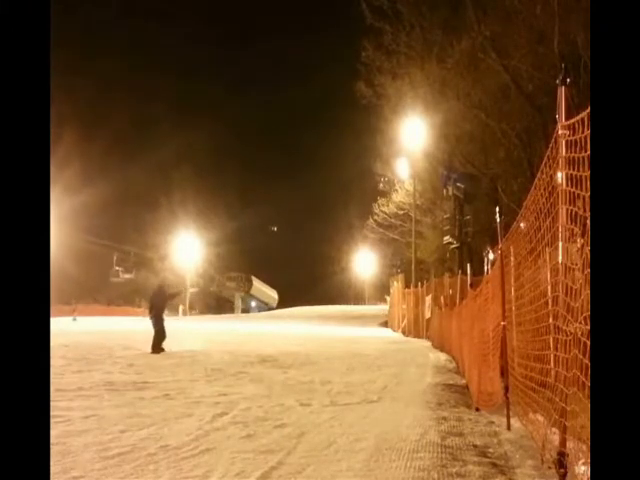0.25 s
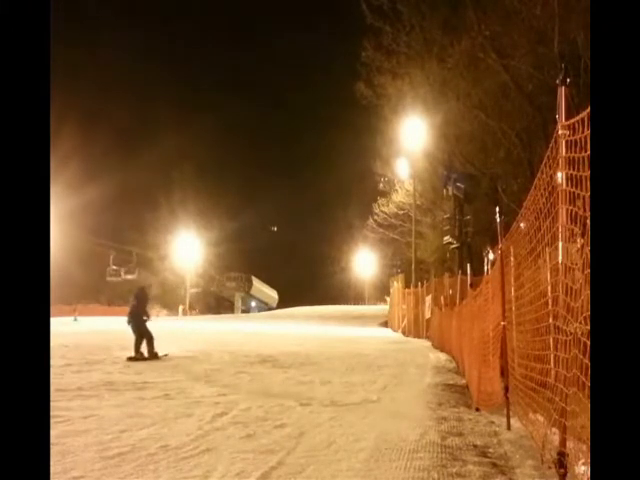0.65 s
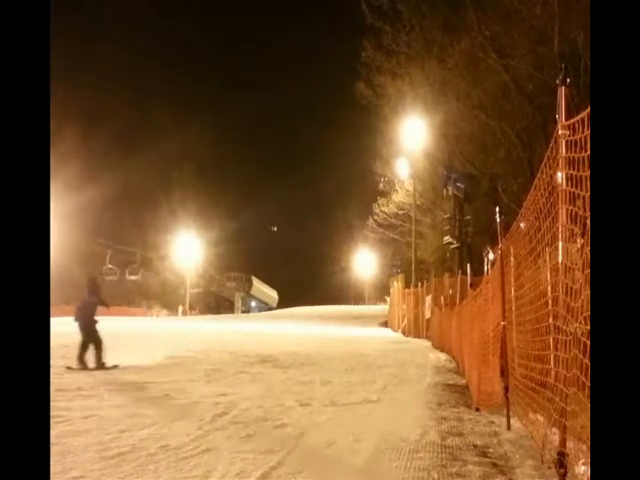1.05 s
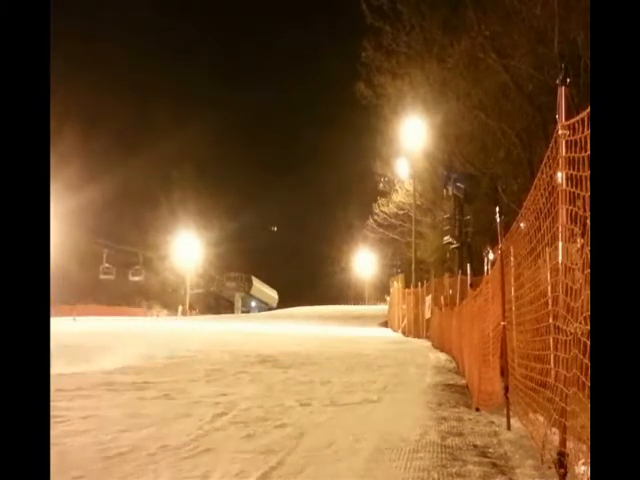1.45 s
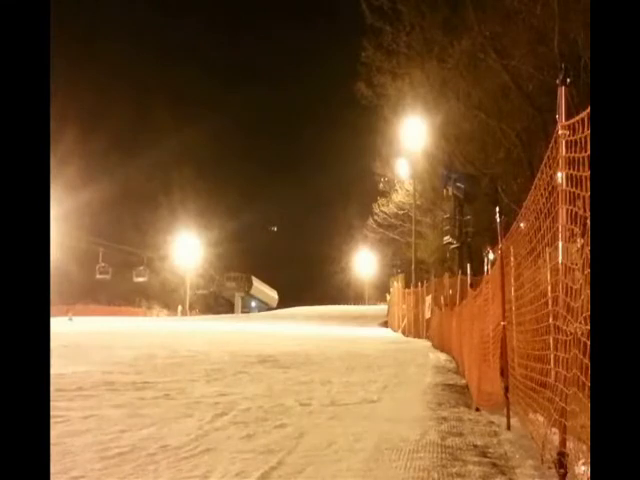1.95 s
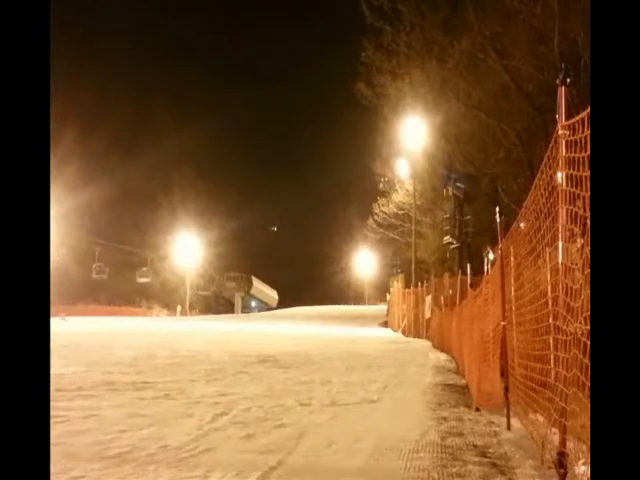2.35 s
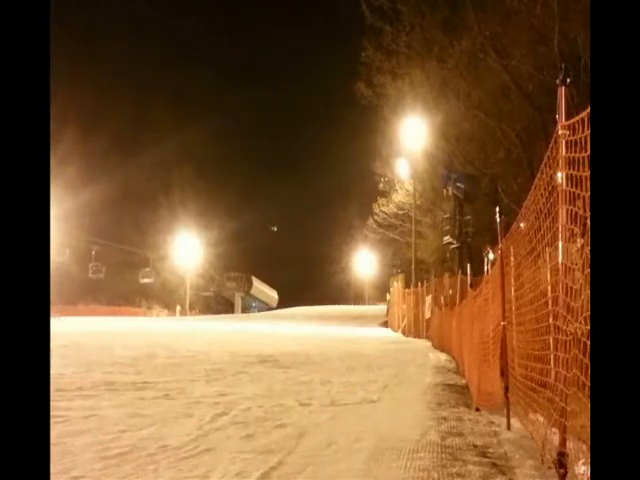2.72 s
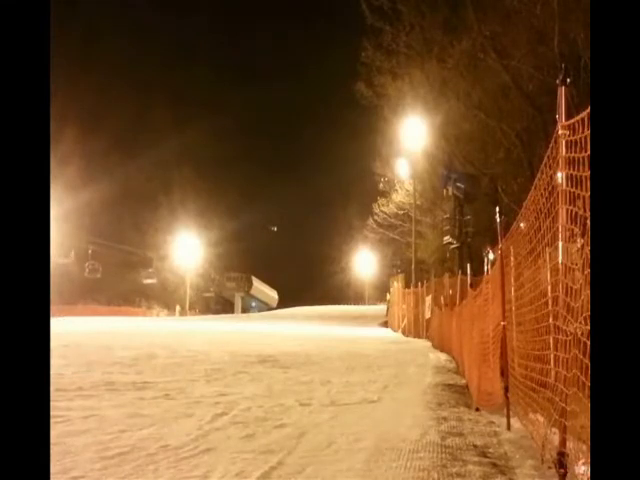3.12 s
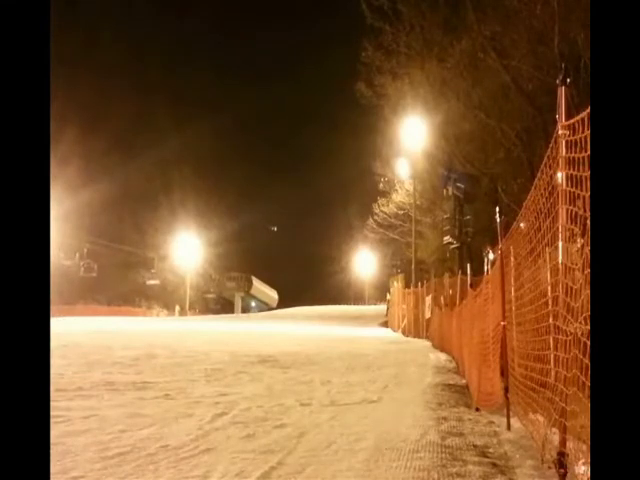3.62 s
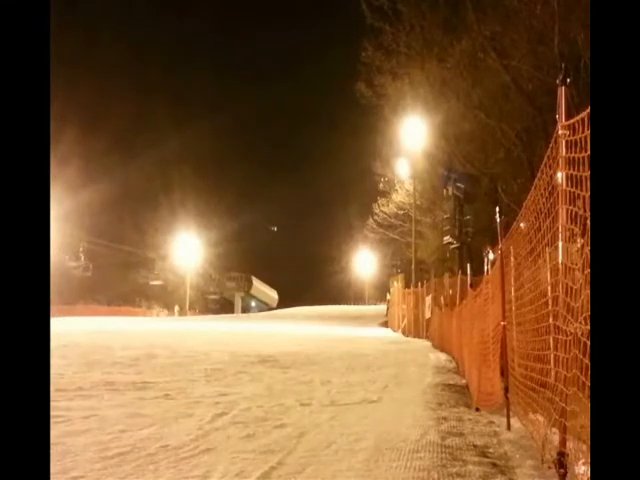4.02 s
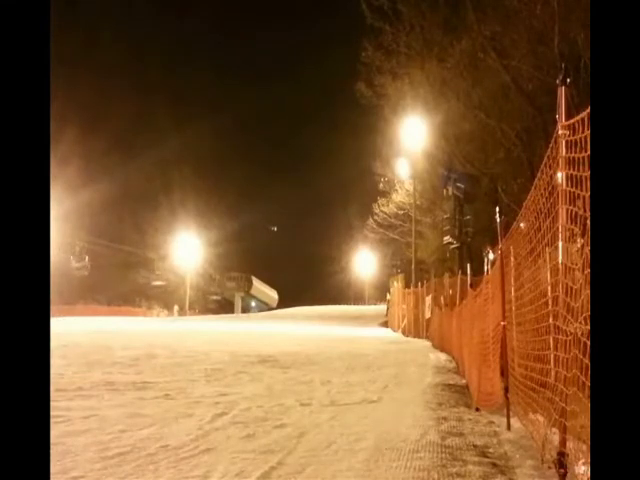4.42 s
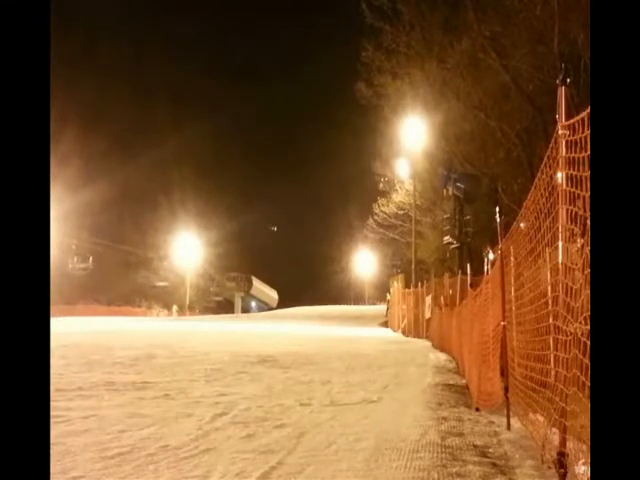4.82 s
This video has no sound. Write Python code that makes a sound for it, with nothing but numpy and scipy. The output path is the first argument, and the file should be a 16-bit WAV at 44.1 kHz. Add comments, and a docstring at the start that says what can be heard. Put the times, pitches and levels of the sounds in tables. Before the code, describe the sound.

On an open night slope, a quiet low lift hum and far hiss come first. A snowboard edge quickly rises into gritty scraping, with rumble, icy crunch and spray swelling around two to three seconds, then continuing in harsh, uneven scrapes. Small ice cracks and dull thumps punctuate it. A handheld stereo microphone hears the rider swing from ahead to the left.

```python
"""A groomed night slope: a snowboard carves past a phone, swinging from ahead to its left side.
Snapping crystals ring resonances as the board's rumble, the edge's scrape and crunch, and the spray;
noise bursts make cracks of ice and thumps over ridges. Resonant noise and wavering tones make a lift
drive's hum, under a faint tone that rises and shaped noise as far hiss.
Two microphone ports, each with its own treble resonance, hear the rider with a growing lag."""
import sys
import numpy as np
from scipy import signal
from scipy.fft import rfft, irfft
from scipy.io import wavfile
from scipy.ndimage import uniform_filter1d, map_coordinates

SR = 44100
rng = np.random.default_rng(int(sys.argv[2]) if len(sys.argv) > 2 else 0)


def convert_level_to_amplitude(level_db):
    """Map a level in decibels to its linear amplitude factor."""
    exponent = np.asarray(level_db, float) / 20
    return 10 ** exponent


def dump(signal):
    """Clip the signal to [-1, 1] and save it as 16-bit WAV at the path in sys.argv[1]."""
    limited = np.clip(np.atleast_2d(signal).T, -1, 1)
    pcm = np.round(limited * 32767).astype(np.int16)
    wavfile.write(sys.argv[1], SR, pcm)


N = 223496

# the left port's lead over the right, which each layer scales by its own factor
LEAD_AHEAD_MS, LEAD_ABEAM_MS = 0.055, 0.488


def unit(x):
    """Scale to rms 1."""
    return x / np.sqrt(np.mean(x ** 2))


def curves(table):
    """Columns of a table as per-sample lines; the first column is time in seconds."""
    s, *columns = np.transpose(table)
    return [np.interp(np.arange(N) / SR, s, column) for column in columns]


def ring(x, hz, width):
    """Resonance, gain 1 at the centre; width in Hz."""
    return signal.lfilter(*signal.iirpeak(hz, hz / width, fs=SR), x)


def walk(rate):
    """Random levels held 1 / rate seconds and slewed twice; spread 1."""
    hold = int(SR / rate)
    steps = np.repeat(rng.standard_normal(N // hold + 1), hold)
    smooth = uniform_filter1d(uniform_filter1d(steps, hold), hold)
    return unit(smooth[:N])


def ports(pair):
    """Each microphone port rings at its own treble pitch."""
    # Resonance of the left, then the right port.
    # Each row: pitch in Hz, width in Hz, level of the added ring in dB.
    port_rings = [(5710, 3560, 2), (6750, 1840, 10.5)]
    return np.array([x + convert_level_to_amplitude(db) * ring(x, hz, width) for x, (hz, width, db) in zip(pair, port_rings)])


def breaks(rate, scatter_db):
    """Crystals snap at random moments, a few much harder than the rest."""
    snapping = rng.random(N) < rate / SR
    hardness = convert_level_to_amplitude(scatter_db * rng.exponential(size=N))
    push = rng.standard_normal(N)
    return unit(snapping * hardness * push)


def layer(modes, grain, tilt_db, fine_db, chatter_db, lead_ms):
    """Snaps ring a set of resonances; the right port hears them late, both hear scattered sound of their own."""
    rate, scatter_db, flicker_db, share, scattered_db, lead_factor = grain
    snaps = np.array([breaks(rate, scatter_db) for _ in range(3)])
    rung = 0
    for hz, width, db in modes:
        # the treble tilts about the second resonance; fine_db moves the treble above 9000 Hz
        mode_db = db + tilt_db * np.log2(hz / modes[1][0]) + (hz > 9000) * fine_db
        mode_db = mode_db + flicker_db * walk(25.02) + share * chatter_db
        rung = rung + convert_level_to_amplitude(mode_db) * ring(ring(snaps, hz, width), hz, 0.92 * width)
    direct, left, right = rung
    heard_at = np.arange(N) - lead_factor * lead_ms * SR / 1000
    late = map_coordinates(direct, [heard_at], order=3, mode="nearest")
    # more scattered sound while the rider is far ahead and the lead still short: 23.5 dB per ms
    scattered = convert_level_to_amplitude(scattered_db + 23.5 * (LEAD_ABEAM_MS - lead_ms))
    pair = np.array([direct, late]) + scattered * np.array([left, right])
    return unit(ports(pair / np.hypot(1, scattered)))


def carving(lead_ms):
    """Rumble, scrape, crunch and spray follow the turn and share the chatter of the edge over the groomed ribs."""
    # The ride through the turn, before each layer weighs it. Each row: time in seconds, pressure on the
    # edge in dB, bite in dB (cutting rather than skidding), flex of the board in dB.
    turn_moves = [(0.0, -49.5, 19.5, 17), (0.14, -30.5, 3.5, 7), (0.38, -34.5, 4.5, 9),
                  (0.55, -24.5, -1, 4), (0.66, -21.5, 1, 4), (0.73, -18, 4.5, 5.5), (0.83, -19, -0.5, 3),
                  (0.92, -14, -5.5, 3.5), (0.99, -14, -3.5, 1.5), (1.07, -18.5, -1.5, 3),
                  (1.24, -21, 1.5, 1.5), (1.31, -20, 3, -4), (1.36, -19.5, -6.5, -6), (1.4, -21, -9, -1),
                  (1.45, -17, -2.5, -6), (1.64, -25, -1.5, 4), (1.86, -18.5, 4, 6), (1.95, -16.5, 3, 5),
                  (2.03, -12.5, -0.5, 1), (2.12, -12, -2, 0), (2.2, -13.5, -3, 0), (2.33, -13.5, -4, 0.5),
                  (2.46, -14, -0.5, 0.5), (2.49, -13, 0.5, 4.5), (2.6, -14, 4.5, 0.5), (2.7, -15.5, 6, 3.5),
                  (2.77, -17, -1.5, 0.5), (2.83, -13, -6, -4), (2.92, -15.5, -0.5, -1), (3.0, -20, 1, 0),
                  (3.1, -16, 6, -1), (3.19, -15, 4.5, -1.5), (3.3, -14.5, 5.5, -0.5), (3.4, -16.5, 8, 0.5),
                  (3.5, -19, 7.5, 3), (3.64, -17.5, 12, -2), (3.82, -14, 11.5, -2.5),
                  (3.9, -16.5, 10.5, -2), (4.04, -16.5, 14.5, 1.5), (4.1, -18.5, 15.5, 3),
                  (4.14, -20, 16, 1.5), (4.19, -22.5, 11, 1.5), (4.36, -20, 7.5, -1),
                  (4.48, -18.5, 10.5, 2.5), (4.58, -16.5, 9, -1), (4.68, -17, 11.5, 0),
                  (4.75, -19.5, 11, 1), (4.8, -20, 8, -8), (4.85, -21, 18, -1.5), (4.9, -15, 10.5, -2),
                  (5.01, -19, 13.5, 3.5), (5.07, -26.5, 21.5, 8)]
    # The edge skips off the snow. Each row: centre in seconds, length in seconds, level change in dB.
    edge_skips = [(3.046, .017, -9.5), (4.770, .026, -4.5), (4.97, .02, -4)]
    # The edge digs in abruptly. Each row: centre in seconds, length in seconds,
    # strength in dB before each layer weighs it.
    edge_digs = [(0.72, 0.05, 3), (0.92, 0.022, -0.5), (1.39, 0.057, 0), (2.48, 0.082, 2.5),
                 (2.536, 0.021, 1), (3.021, 0.017, 2.5), (3.046, 0.013, 7), (4.477, 0.014, 5.5),
                 (4.801, 0.039, 4), (4.84, 0.039, 5), (4.915, 0.03, 4.5), (5.03, 0.096, 1)]
    # Level of the treble above 9000 Hz. Each row: time in seconds, level change in dB.
    top_treble = [(0, -14), (.4, 17), (.65, 21.5), (.9, -3), (1.08, 18), (1.2, 19), (1.32, 23), (1.42, 28),
                  (1.55, 21), (1.8, 13), (2.1, 18), (2.35, 15), (2.6, -28), (2.75, 0), (2.85, 2),
                  (2.95, -11), (3.08, -23), (3.3, -6), (3.5, -11), (3.9, 13), (4.25, 15), (4.55, 9),
                  (4.8, -16), (5.07, -7)]
    # Resonances of board, edge, ice crystals and spray, struck in two passes.
    # Each row: pitch in Hz, width of the first pass in Hz, level against its neighbours in dB before tilt.
    rumble_modes, scrape_modes = [(171, 9.1, -23), (243, 186, 4), (339, 180, 1), (445, 342, -2),
                                  (664, 690, -14)], [(760, 2130, 7.6), (1273, 1700, 2.5), (1985, 2430, 8.2)]
    crunch_modes, spray_modes = [(3055, 830, 7.9), (3776, 1100, 3.7), (4555, 2850, 3)], [(6080, 2300, 15.5), (7414, 2270, 17.5), (8240, 2100, 10),
                                                 (9880, 610, 1.5), (12050, 1600, 5.5)]
    # Texture of rumble, scrape, crunch and spray. Each row: breaks per second, size scatter in dB,
    # own flicker in dB, share of the chatter, scattered sound abeam in dB, factor on the lead.
    textures = [(1800, .8, 1.2, 0.5, -12, 1.13), (5974, 1, 2.2, 0.2, -5, 1.07),
                (14960, 2.2, 0.95, 0.85, -7, .97), (25100, 1.6, 1.1, 0.97, -9, .95)]
    # How the same four layers follow the rider. Each row: offset in dB, then dB per dB of bite,
    # per dB of flex, per ms of lead, per dB of dig.
    layer_levels = [(-8.5, -0.19, 1.47, -0.1, -0.93), (-9, 0.7263, 0.46, -2.55, 0.17),
                    (-6, 0.1446, 0.21, 0, 1.5), (-0.76, -0.32, 0.27, -10.5, 0.35)]
    # Treble tilt of the same four layers. Each row: tilt in dB per octave, then its change per dB of bite,
    # per ms of lead, per dB of flex, per dB of dig.
    layer_tilts = [(-7, -0.0558, 41, 0.24, 1.3), (-1, 0.35, -4.5, 0.1, -1), (13.5, -2, 20, 0.5, -3),
                   (-6.5, 0.9, -28, 0.3, -1.5)]
    # The phone shades its far port, in the same four layers.
    # Each row: left minus right at no lead in dB, its growth in dB per ms of lead.
    phone_shade = [(3.5, -2), (0.7, 8), (0, 16), (2, 3)]

    t = np.arange(N) / SR
    chatter_db = 0.8 * walk(40) + 0.9 * walk(140)
    skip_db = sum(db * np.exp(-((t - s) * 2 / length) ** 6) for s, length, db in edge_skips)
    dig_db = sum(db * np.exp(-((t - s) * 2 / length) ** 4) for s, length, db in edge_digs)
    fine_db, = curves(top_treble)
    pressure_db, bite_db, flex_db = curves(turn_moves)
    all_modes = (rumble_modes, scrape_modes, crunch_modes, spray_modes)
    out = 0
    for modes, grain, mix, tilt, shade in zip(all_modes, textures, layer_levels, layer_tilts, phone_shade):
        db = pressure_db + mix[0] + mix[1] * bite_db + mix[2] * flex_db + mix[3] * lead_ms + mix[4] * dig_db
        tilt_db = tilt[0] + tilt[1] * bite_db + tilt[2] * lead_ms + tilt[3] * flex_db + tilt[4] * dig_db
        pan_db = shade[0] + shade[1] * lead_ms
        gain = convert_level_to_amplitude(db + skip_db + np.array([pan_db, -pan_db]) / 2)
        out = out + gain * layer(modes, grain, tilt_db, fine_db, chatter_db, lead_ms)
    return out


def whistle(pair):
    """A narrow ring of each port that grows as it faces the spray."""
    # A port whistles when the spray blows straight into it.
    # Each row: time in seconds, left ring in dB, right ring in dB.
    facing_spray = [(0, 7, -9), (.6, 0.5, -4), (.9, -5, -1.5), (1.33, -14, -4), (1.45, -25, -7),
                    (1.9, -7.5, -6), (2.15, 0.5, -3), (2.4, -4, -18), (2.7, -5.5, 2), (2.85, -7, 1),
                    (3.0, 2, 14), (3.15, -4, 11), (3.3, -2, 11), (3.42, 2.5, -10), (3.52, 5, 8),
                    (3.7, -7.5, 4.5), (4.0, -9.5, -2), (4.3, -9, -6), (4.65, -12, 4), (4.8, 7, 10),
                    (4.92, -0.5, 1), (5.07, 1, 0)]
    # Whistle of the left, then the right port. Each row: pitch in Hz, width in Hz.
    port_whistles = [(4850, 860), (6780, 680)]
    return np.array([x + convert_level_to_amplitude(db) * ring(x, hz, width)
                     for x, db, (hz, width) in zip(pair, curves(facing_spray), port_whistles)])


def lift_drive():
    """A wavering hum, nearly alike in both ports: resonant noise plus tones."""
    # Noise resonances, each rung twice. Each row: pitch in Hz, width of a pass in Hz, relative level in dB.
    hum_modes = [(33, 24, -21), (55, 16, -21), (92, 21, -2), (123, 70, 4), (158.6, 20, 1.5)]
    # Steady pitches; the lowest two beat against each other.
    # Each row: pitch in Hz, peak over the noise's rms in dB, wavering in dB, wavers per second.
    hum_tones = [(53.6, -6, 2, 3), (57.0, -7, 2, 3), (110, -4, 3.5, 7), (164, -9, 4, 8)]
    # Level of the hum, sinking as the ride goes on. Each row: time in seconds, level in dB.
    hum_level = [(0, -37), (.15, -34.5), (.4, -33.5), (.8, -35), (1.1, -36.5), (1.5, -37.5), (2, -39),
                 (3, -43), (4, -50.5), (4.5, -45.5), (5.07, -53)]
    mid, side = sum(convert_level_to_amplitude(db) * unit(ring(ring(rng.standard_normal((2, N)), hz, width), hz, width))
                    for hz, width, db in hum_modes)
    hum = unit(mid + 0.19 * np.array([side, -side]))
    t = np.arange(N) / SR - 0.11  # the tones line up at 0.11 s, a crest of the beat
    port_phase = np.array([[0.2], [-0.2]])  # radians
    for hz, db, waver_db, rate in hum_tones:
        hum = hum + convert_level_to_amplitude(db + waver_db * walk(rate)) * np.sin(2 * np.pi * hz * t + port_phase)
    return convert_level_to_amplitude(curves(hum_level)[0]) * hum


def whine():
    """A faint flickering sine glides up, then settles slightly lower."""
    # Each row: time in seconds, pitch in Hz, peak level in dB before the flicker.
    whine_glide = [(.1, 375, -53), (.2, 395, -43), (.4, 445, -46), (.55, 481, -42), (.65, 484, -43),
                   (.75, 470, -50)]
    hz, db = curves(whine_glide)
    return convert_level_to_amplitude(db + 6 * walk(24.1)) * np.sin(2 * np.pi * np.cumsum(hz) / SR)


def far_hiss():
    """Smooth noise shaped in frequency, wider in the treble than in the bass, fading slowly."""
    # Spectrum of the hiss. Each row: frequency in Hz, relative density in dB per Hz.
    hiss_shape = [(90, -17), (180, 1.5), (450, -9), (700, -11), (3300, -17), (6500, -12.5), (10000, -14.5),
                  (13000, -19.5), (15000, -14)]
    hz = np.fft.rfftfreq(N, 1 / SR) + 1  # + 1 keeps the logarithm finite
    at_hz, db = np.transpose(hiss_shape)
    mid, side = rfft(rng.standard_normal((2, N))) * convert_level_to_amplitude(np.interp(np.log(hz), np.log(at_hz), db))
    side = side * np.minimum(hz / 640.0, 0.7)
    hiss = irfft(np.array([mid + side, mid - side]), N)
    start_db, db_per_s = -26.5, -1.5
    return convert_level_to_amplitude(start_db + db_per_s * np.arange(N) / SR) * unit(ports(hiss))


def blows(table, fade_ms, width, db, lead_ms):
    """Each blow is a fading burst of noise around its pitch; the right port hears it late."""
    length = 2048  # samples
    out = np.zeros((2, N + 2 * length))
    fade = np.exp(-np.arange(length) / SR * 1000 / fade_ms)
    for (s, peak_db, hz), noise in zip(table, rng.standard_normal((len(table), length))):
        burst = ring(ring(noise * fade, hz, width * hz), hz, width * hz)
        burst = convert_level_to_amplitude(peak_db + db) * burst / np.abs(burst).max()
        at = int(s * SR)
        late = at + int(lead_ms[at] * SR / 1000)
        for port, start in zip(out, (at, late)):
            port[start:start + length] += burst
    return out[:, :N]


def cracks_and_thumps(lead_ms):
    """Lumps of ice crack under the edge; the board thumps over hard ridges."""
    # Single blows. Each row: start in seconds, peak in dB before the level of its kind, pitch in Hz.
    ice_cracks, ridge_thumps = [(0.906, -6, 5180), (1.129, -4, 7270), (1.409, -4, 6200), (1.458, -4, 5870),
                                (2.4615, -23, 7500), (3.01, -8.5, 6500), (3.0324, -8, 6700),
                                (3.054, -16, 6660), (3.1637, -26, 6770), (3.3997, -6, 4690),
                                (3.8057, -11, 2250), (3.9624, -3.5, 2030), (4.007, -9, 2190),
                                (4.1001, -5, 1930), (4.7005, -5, 5150), (4.794, -12, 4680),
                                (4.8124, -21, 5330), (4.8454, -20, 4940), (4.91, -5, 4770),
                                (4.9498, -9, 1780), (4.9974, -16, 1960)], [(0.898, -7.5, 266), (0.954, -9, 339), (0.996, -8, 197),
                                                (1.529, -14, 188), (1.839, -19, 355), (2.468, -10, 366),
                                                (2.485, -10, 207), (2.497, -12.5, 318), (2.528, -16, 210),
                                                (2.546, -6, 590), (2.596, -15, 450), (2.667, -23, 223),
                                                (2.694, -27, 320), (2.732, -12, 495)]
    # Cracks, then thumps. Each row: fade time constant in ms, width of each of two passes over pitch,
    # level in the ports in dB.
    blow_kinds = [(2.0, 1.0, -1), (6.0, 1.2, -4)]
    return sum(blows(table, *kind, lead_ms) for table, kind in zip((ice_cracks, ridge_thumps), blow_kinds))


def detour(right):
    """The right port also hears the rider a moment later round the phone's body.

    The shrinking second path sweeps a notch up the treble while the rider draws level."""
    centre_s, length_s, peak_share = 3.214, 0.17, 0.42
    t = np.arange(N) / SR - centre_s
    share = peak_share * np.exp(-(t / length_s) ** 4)
    notch_hz = 4900 * 2 ** (2.8 * np.clip(t, -1, 1))  # rises 2.8 octaves per second
    delay = SR / (2 * notch_hz)  # half a period of the notch
    late = map_coordinates(right, [np.arange(N) - delay], mode="nearest")
    return (right + share * late) / (1 + share)


def board():
    """The carving edge and its blows, as the ports hear them while the rider swings abeam."""
    t = np.arange(N) / SR
    swing_s, swing_length_s = 2.326, 1.34
    swing = (1 + np.tanh((t - swing_s) / swing_length_s)) / 2
    lead_ms = LEAD_AHEAD_MS + (LEAD_ABEAM_MS - LEAD_AHEAD_MS) * swing
    left, right = carving(lead_ms) + cracks_and_thumps(lead_ms)
    out = whistle([left, detour(right)])
    # a narrow board radiates no deep bass
    return signal.sosfilt(signal.butter(4, 115.0, "high", fs=SR, output="sos"), out)


def scene():
    """The rider over the lift drive, the faint tone and the far hiss."""
    return board() + whine() + lift_drive() + far_hiss()


def roll_off(x):
    """The treble ends steeply here."""
    return signal.sosfilt(signal.butter(12, 14520, fs=SR, output="sos"), x)


def record(dry):
    """The deep bass is cut and at times nearly vanishes; the highest peaks are rounded."""
    # The deep bass drops out. Each row: start in seconds, end in seconds, upper limit of the loss in Hz.
    bass_dropouts = [(2.1, 3.07, 80.), (3.1, 3.2, 60.), (3.27, 3.47, 85.), (3.68, 4.19, 88.),
                     (4.82, 4.98, 120.)]
    dropout_db, edge_s, ceiling = -40, 0.024, 0.95
    t = np.arange(N) / SR
    thin = signal.sosfilt(signal.butter(2, 25.0, "high", fs=SR, output="sos"), dry)
    for start, end, hz in bass_dropouts:
        on = (np.tanh((t - start) / edge_s) - np.tanh((t - end) / edge_s)) / 2
        bass = signal.sosfiltfilt(signal.butter(4, hz, fs=SR, output="sos"), thin)
        thin = thin - on * (1 - convert_level_to_amplitude(dropout_db)) * bass
    rounded = thin / (1 + (thin / ceiling) ** 4) ** (1 / 4)
    return roll_off(rounded)


dry = scene()
out = record(dry)
dump(out)
```